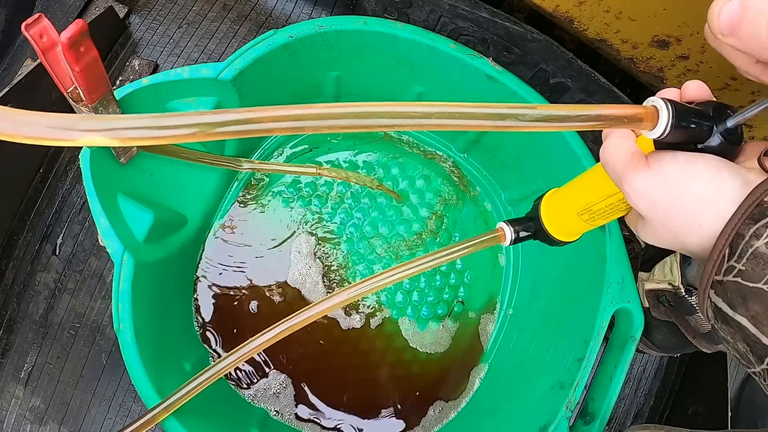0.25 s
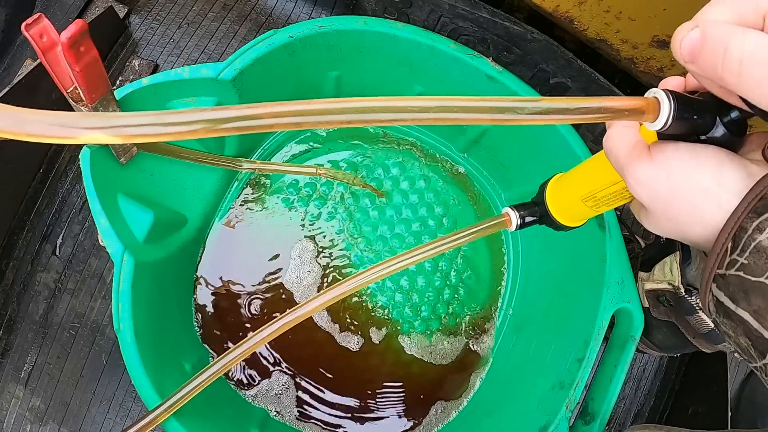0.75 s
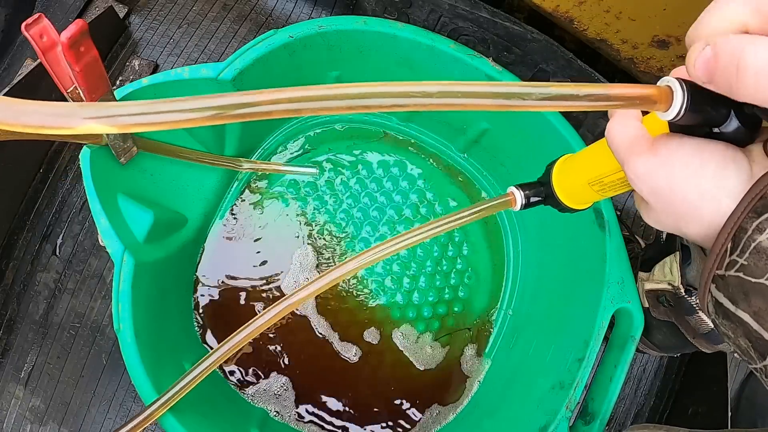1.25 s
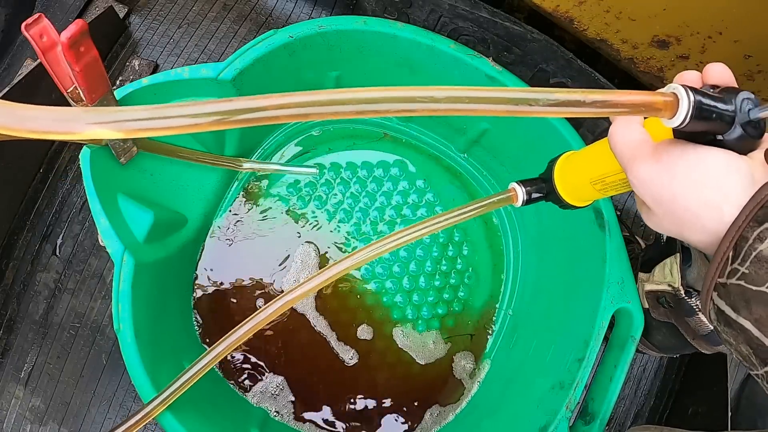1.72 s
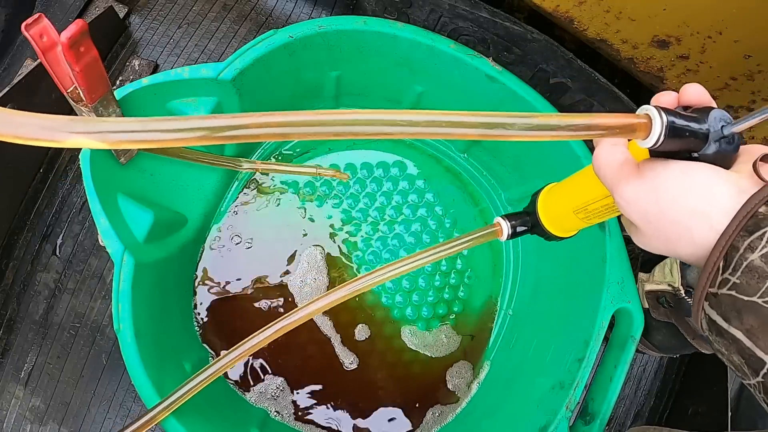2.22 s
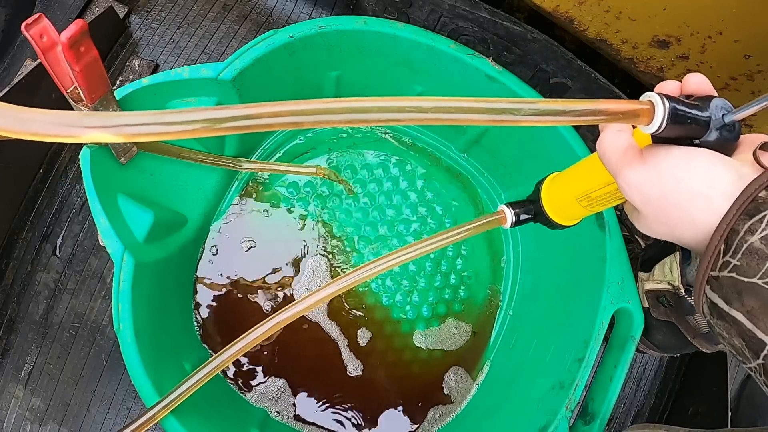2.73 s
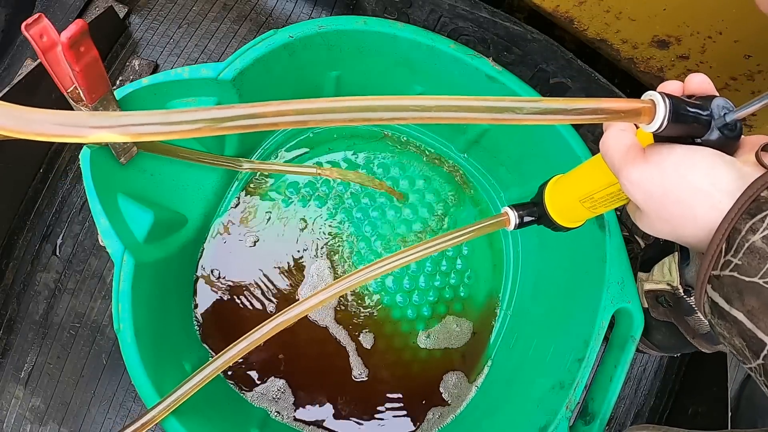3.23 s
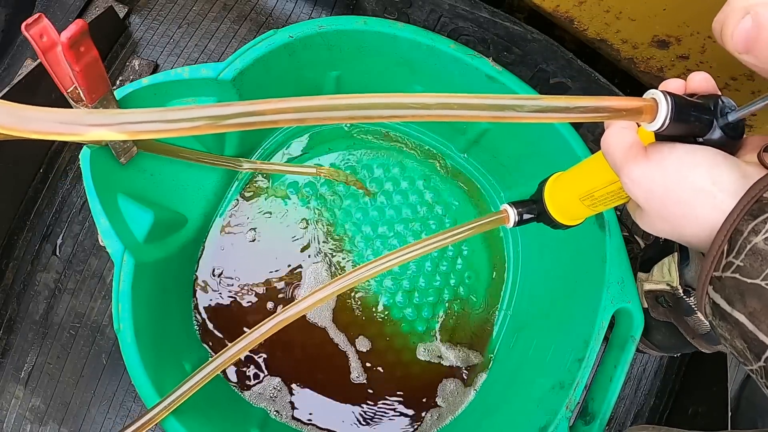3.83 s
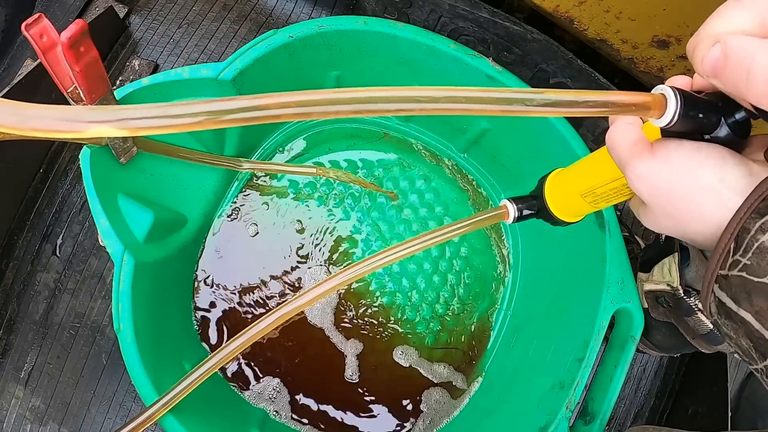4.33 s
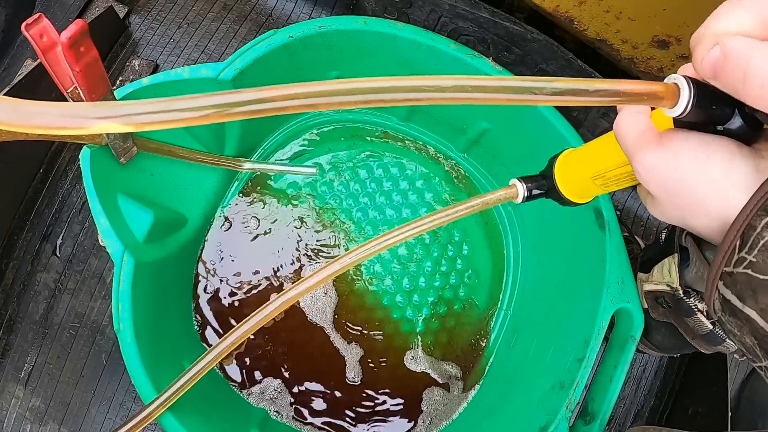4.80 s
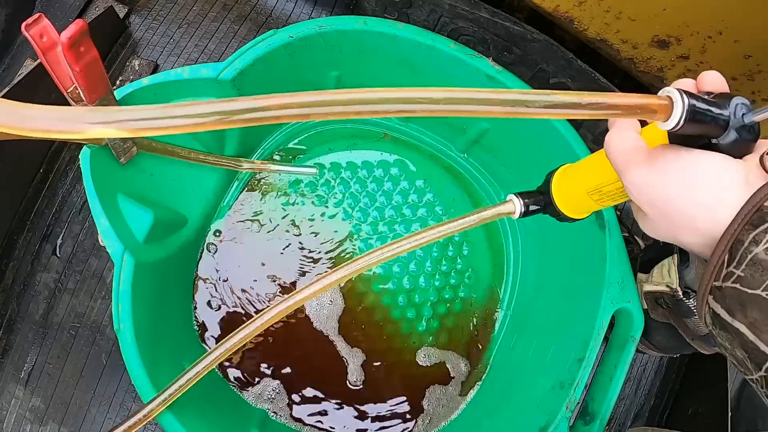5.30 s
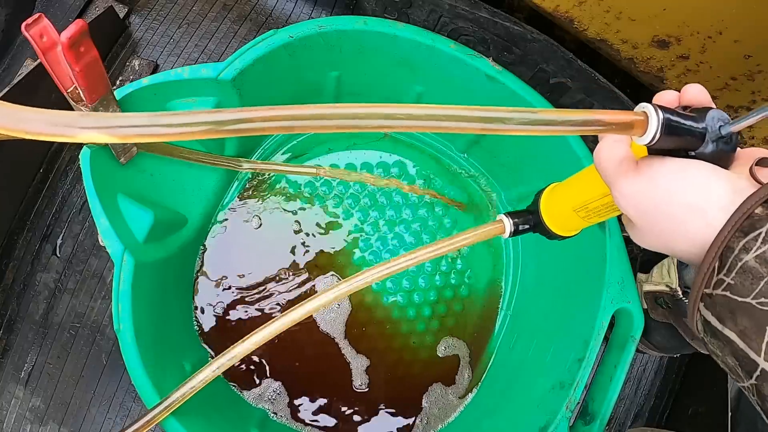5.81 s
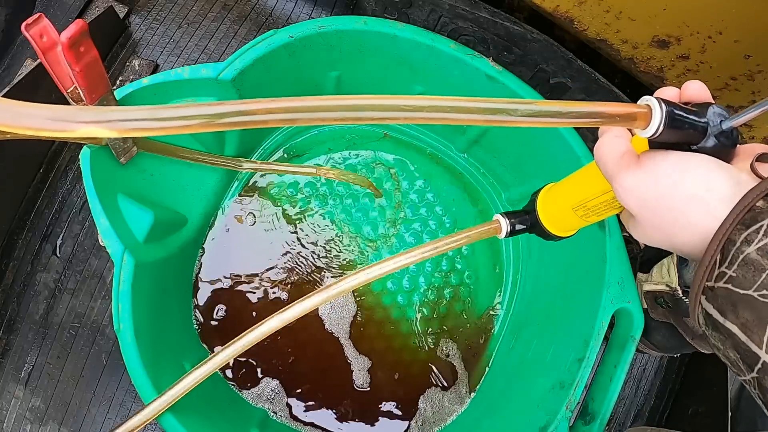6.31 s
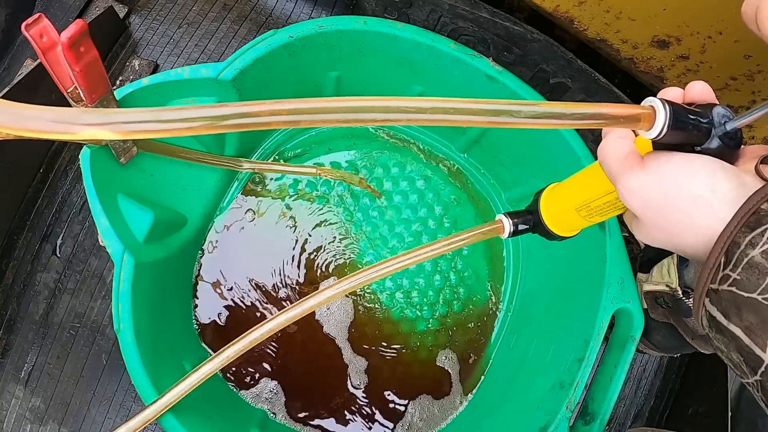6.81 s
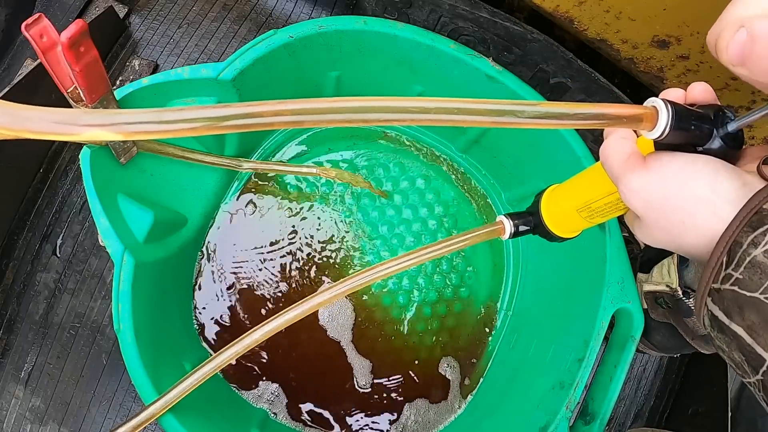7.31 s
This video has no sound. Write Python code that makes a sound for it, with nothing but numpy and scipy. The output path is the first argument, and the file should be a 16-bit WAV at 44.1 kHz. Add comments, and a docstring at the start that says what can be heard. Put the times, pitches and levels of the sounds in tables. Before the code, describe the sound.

Rubbery, scraping pump squeals alternate with quick breathy valve hisses. The first hiss ends in a sharp, rattling clack; after the second come chirps, ticks and hollow gulps in the hose. A thin jet of fuel spatters quietly in a plastic tub nearby, with short tub reflections and soft low rumble. Close pickup, starting nearly mono and widening, ending mid-squeal.

```python
"""Stiff hand pump filling a tub

A stiff hand pump draws fuel into a plastic tub, close to the microphone.
On long pulls the seal squeals (stick-slip tone and noise, breaking into chirps) and a thin stream patters (noise).
Each quick push hisses through the valve (noise); the first ends in a hard knock (decaying modes and rattle).
Air gulps through the hose after the second (rising, decaying tones). A low rumble (noise) lies underneath."""
import sys
import numpy as np
from scipy import signal
from scipy.fft import rfft, irfft, next_fast_len
from scipy.io import wavfile
from scipy.ndimage import uniform_filter1d, map_coordinates

SR = 44100
rng = np.random.default_rng(int(sys.argv[2]) if len(sys.argv) > 2 else 0)


def unload_wav(signal):
    """Save mono or channel-first audio to the path in sys.argv[1] as 16-bit WAV at rate SR, clipped to [-1, 1]."""
    wavfile.write(
        sys.argv[1],
        SR,
        np.round(np.clip(np.atleast_2d(signal).T, -1, 1) * 32767).astype(np.int16),
    )


N = 332955
TIME_S = np.arange(N) / SR

# Left-right likeness of noise: freq_hz, correlation
STEREO_LIKENESS = [(60, 1), (200, 0.11), (500, 0.59), (1500, 0.82), (3000, 0.73), (7000, 0.59),
                   (12000, 0.074)]
# Low rumble spectrum: freq_hz, density_db_per_hz
RUMBLE_SPECTRUM = [(12, -32.5), (20, -16), (49, -4.5), (65, 4.5), (76, -6), (92, -9.5), (113, -10.5),
                   (214, -8.5), (282, -23), (365, -31.5), (450, -30), (580, -31), (990, -120)]
# Background noise spectrum: freq_hz, density_db_per_hz
AIR_SPECTRUM = [(100, -5), (230, -5), (400, -10.5), (800, -17), (1400, -8), (3000, -40), (9000, -27.5),
                (15000, -37)]
# Dull bumps of handling: peak_s, level_db, rise_s, fall_s
BUMPS = [(.45, -35.5, 0.039, 0.08), (1.28, -33, 0.111, 0.21), (2.14, -29.5, 0.13, 0.31),
         (2.35, -33, 0.064, 0.04), (2.59, -39.5, 0.11, 0.082), (3.15, -31, 0.023, 0.094),
         (3.3, -32.5, 0.083, 0.038), (3.75, -40, 0.48, 0.4), (4.72, -36, 0.084, 0.38),
         (5.0, -40, 0.0356, 0.13), (5.65, -35.5, 0.14, 0.06)]
RUMBLE_DB, RUMBLE_SWAY_DB, RUMBLE_SWAY_KNOTS_PER_S = -47.5, 4.5, 18

# Patter in the tub: freq_hz, density_db_per_hz
SPLASH_SPECTRUM = [(150, -43), (250, -10), (326, -0.5), (557, -7.5), (753, -8.5), (927, -8), (1490, -5.5),
                   (1620, 0), (2020, -7.5), (4000, -11), (5200, -64), (8800, -120)]
# Hiss of the jet: freq_hz, density_db_per_hz
SPRAY_SPECTRUM = [(1060, -35), (1800, 0), (2750, -1.5), (2980, -1), (5650, 5), (6070, 2), (7470, 4.5),
                  (8630, 2), (9620, -6), (15500, -21.5)]
# Runs of the jet between pushes: start_s, end_s, level_db, build_up_s
SPURTS = [(-.1, 1.72, -52, .05), (2.25, 3.05, -53, .03), (2.8, 5.22, -51.5, .6), (5.75, 6.5, -48, .03),
          (6.2, 7.8, -51, .8)]
# Gushes of fuel into the tub: peak_s, level_db, rise_s, fall_s
GUSHES = [(.05, -58, 0.35, .5), (1.3, -52.5, 0.043, 0.437), (2.27, -52.5, 1, 0.326),
          (5.03, -48, 0.52, 0.29), (5.8, -54.5, 0.079, 0.087), (6.17, -43.5, 0.22, 0.16)]
SPURT_RELEASE_S, DRIBBLE_DB = .2, -66
# Reflections in the tub: freq_hz, t60_s
TUB_DECAY = [(200, 0.32), (1000, 0.188), (3000, 0.055), (10000, 0.0656)]

# Plunger hits its stop: start_s, level_db over the first 20 ms
SLAM = [(2.1065, -14.5)]
# Lighter knocks of plunger and hand: start_s, peak_db, lowpass_hz
KNOCKS = [(0.161, -26.5, 2410), (0.177, -34.5, 1000), (1.229, -37, 330), (4.82, -30.5, 336),
          (4.837, -40, 300), (4.926, -39.5, 970), (6.146, -34, 1800), (6.194, -32.5, 1600),
          (6.244, -36, 1500)]
# Pump body modes: freq_hz, mean_level_db, t60_s
BODY_MODES = [(164.8, -16, 0.38), (216.5, 1.5, 0.25), (249, 3, 0.14), (344.5, 8, 0.051), (472, 9.5, 0.036),
              (753, 2, 0.04), (1030, -2, 0.067), (1730, 1.5, 0.032), (2485, 13.5, 0.017),
              (3586, -2, 0.0323)]
# Rattle spectrum of a blow: freq_hz, density_db_per_hz
RATTLE_SPECTRUM = [(60, -26), (130, -11), (220, 0.5), (480, -6.5), (1000, -10.5), (1500, -0.5),
                   (2600, -6.5), (3600, -10), (6000, -19.5), (12000, -29)]
OCTAVES_HZ = 125 * 2.0 ** np.arange(7)
# Air gulps through the hose: start_s, level_db, start_pitch_hz
GLUGS = [(6.147, -31.5, 239), (6.165, -25.5, 227), (6.179, -33, 227), (6.192, -31, 250), (6.215, -50, 280)]
# Hose partials: pitch_multiple, level_db, t60_s
HOSE_PARTIALS = [(1, 0, .07), (2.08, -8, .04), (5.1, -3.5, 0.028), (5.9, -2, 0.028)]

# Valve hiss spectrum: freq_hz, density_db_per_hz
VALVE_SPECTRUM = [(120, -30.5), (200, -40), (244, -33), (607, -16.5), (858, -27), (1090, -10), (1480, -7.5),
                  (1650, -1), (2650, -11), (3960, -15), (8500, -20.5), (12900, -43), (15500, -51.5)]
# Valve resonances: freq_hz, width_hz, level_db
THROAT_MODES = [(3620, 100, -20), (5100, 200, -12), (6130, 140, -12), (8400, 350, -19)]
# Quick pushes: start_s, end_s, attack_s
PUSH_TIMES = [(1.655, 2.115, .07), (5.1, 5.6, .14)]
# Push strength: low_hiss_db, low_swell_per_push_db, high_hiss_db, fizz_db, fizz_fall_per_push_db
PUSH_HISS = [(-45, 17.5, -40.5, -46.5, 10), (-36.5, 6, -36.5, -42.5, 25.5)]
PUSH_RELEASE_S, HIGH_FALL_DB = 0.026, 2
LOW_FULL_SHARE, FIZZ_PEAK_SHARE = 0.4, 0.34  # shares of the push
CHURN_DB, CHURN_KNOTS_PER_S = 1.7, 55  # each hiss band surges by itself

# Barrel resonances: freq_hz, width_hz, level_db
BARREL_MODES = [(2616, 94, 0), (2777, 28, -4), (2876, 44, -4.5), (3166, 24, 0), (3242, 11, 4),
                (3558, 24.5, -9), (3620, 30, 2), (3977, 170, -1.5), (4145, 88, -0.5), (4508, 28, -14),
                (4896, 49, 4), (5420, 133, -4.5), (6610, 25, 8), (7946, 54, -9)]
# Dry friction spectrum: freq_hz, density_db_per_hz
RUB_SPECTRUM = [(710, -32), (1200, -23), (2210, -9.5), (2540, -9.5), (2680, -6.5), (3320, -8.5),
                (4020, -15), (4430, -5), (5550, -8.5), (6240, -3), (8150, -3), (8790, -14.5), (12900, -55),
                (15500, -61)]
RUB_GROWTH_DB_PER_DB, FIRM_DB = 0.21, -23.5  # extra rub per dB of effort, up to a firm pull
# Short snatches of seal and valve: start_s, peak_db, centre_hz, t60_s
TICKS = [(0.494, -32, 2310, 0.1), (.718, -39, 6950, 0.016), (1.238, -35, 1780, 0.13),
         (1.326, -27.5, 4300, 0.017), (1.342, -22.5, 4900, 0.021), (1.342, -26, 2620, 0.016),
         (1.341, -22, 7860, 0.017), (1.378, -32.5, 2230, 0.032), (1.394, -33.5, 2784, 0.029),
         (1.404, -25.5, 2650, 0.028), (1.44, -32.5, 3650, 0.12), (1.476, -32.5, 4400, 0.06),
         (2.258, -28.5, 4800, 0.029), (2.595, -19.5, 4970, 0.033), (3.162, -29, 8350, 0.018),
         (5.337, -18, 2940, 0.0153), (5.366, -18.5, 1800, 0.054), (5.592, -21.5, 3445, 0.035),
         (5.758, -34, 7900, 0.038), (6.091, -18.5, 2540, 0.046), (6.103, -21, 4056, 0.18),
         (6.164, -20.5, 8150, 0.031), (6.181, -22, 7600, 0.0245), (6.237, -17, 7150, 0.024),
         (6.282, -32.5, 4030, 0.016), (6.545, -24.5, 9100, 0.017), (6.625, -24, 7430, 0.032)]

# Single chirps (piston creeps, turns or bites):
# middle_s, length_s, pitch_hz, level_db, glide_octaves, scoop_octaves
CHIRPS = [(0.724, 0.025, 4820, -45, 0.013, -0.17), (0.755, 0.042, 4550, -44, -0.09, .15),
          (0.799, 0.034, 3520, -47, -0.039, 0.26), (0.805, 0.062, 4344, -48, 0.0074, 0.087),
          (0.882, 0.044, 3470, -50, -0.033, 0.045), (0.927, 0.046, 3850, -54, 0.044, -.08),
          (.985, 0.0365, 3500, -54, 0.16, 0.37), (1.277, 0.039, 2740, -47, -0.23, -0.016),
          (1.339, 0.032, 8120, -27, -0.01, -0.089), (1.52, 0.046, 2760, -40.5, .22, -0.2),
          (1.56, .035, 3080, -45, -.06, -0.12), (1.583, 0.083, 2570, -46, 0.056, 0.22),
          (1.652, 0.044, 6604, -41.5, 0.43, 0.39), (2.303, 0.0226, 6170, -33.5, 0.48, 0.02),
          (2.391, 0.021, 5480, -33.5, 0.36, 0.19), (2.434, 0.099, 6550, -35, 0.074, 0.3),
          (3.113, 0.0332, 5524, -39.5, -0.033, 0.058), (3.864, .022, 2560, -29.5, 0, .08),
          (3.944, 0.018, 2594, -21.5, 0, .02), (4.017, 0.018, 2700, -24, .05, 0),
          (4.158, 0.011, 5420, -30, 0, 0.0035), (4.216, 0.024, 4960, -24.5, 0, 0),
          (4.176, 0.011, 3980, -27.5, 0.011, 0), (4.37, 0.101, 7870, -36.5, -0.076, -0.21),
          (4.446, 0.077, 6220, -35, 0.079, 0.24), (4.505, 0.043, 4980, -52.5, 0, 0.15),
          (4.543, 0.1, 6270, -38.5, -0.11, -0.054), (4.59, 0.064, 4580, -46, -0.093, 0.38),
          (4.647, 0.056, 6060, -41.5, 0.12, 0.014), (4.71, 0.074, 6260, -46, 0.23, .2),
          (4.77, .05, 7650, -47, 0.058, .06), (5.139, 0.037, 5950, -38.5, 0.42, 0.32),
          (5.594, 0.01, 4920, -24.5, -0.14, 0.064), (5.759, 0.012, 5030, -28, 0.12, 0.4),
          (5.785, 0.046, 7300, -23.5, 0.1, 0.38), (5.859, 0.049, 4160, -27.5, 0.11, 0.74),
          (5.853, 0.07, 5060, -28.5, 0.082, 0.76), (5.951, 0.04, 7510, -27.5, 0.086, 0.19),
          (6.111, 0.014, 4050, -30, .05, 0.15), (6.003, 0.063, 7830, -36, 0.02, 0.24)]
# High chirps scrape more: pitch_hz, roughness_0_to_1
CHIRP_ROUGHNESS = [(2700, .5), (4000, .62), (5500, .76)]
CHIRP_EDGE_DB, CHIRP_OVERTONE_DB, CHIRP_STRANDS_DB = 5.5, -12, -5  # edge: fade at both ends

# Seal pitch, one list per long pull, lowest where the piston is fastest: time_s, pitch_hz
PULL_PITCH = [
    [(0, 3450), (.033, 3278), (.06, 3506), (.1, 3497), (.135, 3458), (.175, 3663), (.205, 3380),
     (.235, 3411), (.27, 3940), (.305, 3856), (.34, 4037), (.42, 4073), (.51, 4290), (.565, 3850),
     (.67, 3840), (.695, 4170)],
    [(3.1, 5400), (3.13, 5594), (3.18, 4961), (3.2, 5350), (3.28, 5960), (3.31, 6580), (3.345, 5120),
     (3.39, 5900), (3.42, 5320), (3.465, 6236), (3.49, 5386), (3.53, 5704), (3.57, 5040), (3.62, 4420),
     (3.69, 3567), (3.77, 3524), (3.79, 3165), (3.84, 3127), (3.87, 2690), (3.915, 2485), (3.945, 2622),
     (3.985, 2470), (4.05, 2868), (4.09, 3200), (4.12, 4220), (4.16, 3434), (4.205, 4850), (4.245, 4910),
     (4.265, 6770), (4.3, 7230), (4.33, 6050)],
    [(6.25, 4947), (6.28, 4050), (6.33, 5110), (6.357, 4180), (6.395, 5330), (6.445, 4300), (6.505, 4910),
     (6.54, 4606), (6.595, 6210), (6.63, 5640), (6.665, 6290), (6.69, 5001), (6.715, 4770), (6.76, 5360),
     (6.81, 4290), (6.835, 5014), (6.885, 4065), (6.94, 3824), (7.0, 4084), (7.035, 3186), (7.09, 3086),
     (7.15, 3530), (7.2, 3593), (7.23, 3870), (7.265, 2646), (7.283, 2525), (7.315, 3407), (7.345, 2798),
     (7.368, 2363), (7.41, 3015), (7.435, 2946), (7.463, 2600), (7.55, 2936)],
]
# Force of the hand, one list per pull: time_s, level_db
PULL_EFFORT = [
    [(0.0, -35.5), (0.032, -29), (0.045, -31.5), (0.232, -32), (0.268, -28), (0.3, -32), (.346, -31.5),
     (0.428, -30.5), (.56, -40), (0.736, -47.5), (1.05, -59.5)],
    [(3.1, -43), (3.11, -37.5), (3.225, -35), (3.266, -39.5), (3.376, -34.5), (3.4, -37.5), (3.53, -34.5),
     (3.61, -26), (3.84, -28.5), (3.875, -24.5), (3.9, -28), (3.94, -26), (4.11, -31), (4.135, -41),
     (4.175, -38), (4.198, -35), (4.208, -32), (4.25, -28.5), (4.33, -33)],
    [(6.25, -53), (6.42, -45.5), (6.465, -33.5), (6.488, -44), (6.498, -30), (6.59, -34), (6.676, -34),
     (6.69, -30.5), (6.78, -29), (6.8, -34), (6.876, -27.5), (6.886, -30.5), (6.96, -27), (6.976, -35),
     (7.006, -23.5), (7.2, -23), (7.276, -20), (7.43, -19.5), (7.46, -17), (7.55, -21)],
]
# Uneven slipping, one list per pull: time_s, roughness_0_to_1
PULL_ROUGHNESS = [
    [(0, .9), (.03, .45), (.05, .82), (.23, .9), (.27, .45), (.31, .8), (.5, .8), (.58, .3), (.69, .35)],
    [(3.1, .45), (3.3, .6), (3.45, .9), (3.62, .75), (3.76, .6), (3.81, 1), (3.92, .95), (3.945, .7),
     (3.98, 1), (4.16, 1), (4.21, .5), (4.33, .6)],
    [(6.25, .7), (6.5, .6), (6.62, .85), (6.72, .62), (6.95, .68), (7.05, .45), (7.12, .95), (7.24, 1),
     (7.278, .25), (7.305, .65), (7.338, .85), (7.355, .3), (7.385, .3), (7.42, .75), (7.46, .22),
     (7.5, .3), (7.55, .55)],
]
# How the seal sits, one row per pull: tone_db, overtone_db, strands_db, rub_db
GRIP = [(0, -1.5, -8, -2.5), (0, -4, -6.5, -7), (0, -8.5, -8.5, -5.5)]
# Second patch of the seal, one list per pull: time_s, pitch_hz, level_db
LIP = [
    [(.3, 4500, -49), (.44, 4610, -46), (.5, 4527, -39), (.535, 5344, -35.5), (.56, 4747, -45),
     (.63, 4500, -40), (.65, 5263, -41.5), (.69, 5435, -47)],
    [(3.41, 7600, -41), (3.46, 8200, -35), (3.485, 6610, -26), (3.53, 7084, -29.5), (3.6, 6312, -27),
     (3.64, 5398, -29), (3.68, 5316, -26.5), (3.72, 4800, -27.5), (3.755, 5300, -28), (3.78, 4140, -32),
     (3.85, 4250, -31), (3.9, 4037, -36.5), (4.0, 4550, -28.5), (4.04, 5297, -28), (4.06, 4928, -31),
     (4.095, 5447, -28.5), (4.13, 6141, -33.5), (4.148, 5560, -32), (4.158, 5406, -27.5), (4.18, 6446, -32),
     (4.21, 6780, -29), (4.25, 5778, -34)],
    [(6.45, 5380, -46), (6.67, 7140, -52.5), (6.71, 6290, -50), (6.78, 6100, -44), (6.81, 5100, -34),
     (6.85, 5740, -40), (6.9, 5017, -32.5), (7.01, 5195, -31), (7.05, 3975, -30.5), (7.23, 4194, -39),
     (7.28, 3700, -27), (7.315, 4390, -22.5), (7.36, 3750, -27), (7.41, 4155, -28.5), (7.47, 3915, -28.5),
     (7.55, 4153, -23.5)],
]
LIP_ROUGHNESS, LIP_OVERTONE_DB, LIP_STRANDS_DB = .72, -24, -6
# Stray squeals around the main pitch: offset_hz, level_db
STRANDS = [(-650, -8), (-320, -2), (380, -2), (900, -7), (1500, -12), (2450, -13)]
DIP_DB_PER_OCT = 1  # a brief dip in pitch is louder
JUDDER_OCT, JUDDER_KNOTS_PER_S = .026, 100
CATCH_DB, CATCH_KNOTS_PER_S = 2.2, 75  # each patch catches and lets go
HALF_HELD_ROUGHNESS, HOLD_SLOPE, LOOSE_DB = .85, 3.6, -7  # held half the time; rate of change; tone when loose
BREAK_UP_SHARE = .5  # tone power removed at full roughness
LOCK_SHARE, LOCK_REACH_HZ = .5, 260  # pull of a barrel resonance on the pitch

WIDEN_START_S, WIDEN_S = 1.02, 3.17
TOP_HZ = 15250


def amp(db):
    """Amplitude of a level in dB."""
    return 10 ** (np.asarray(db) / 20)


def unit(x):
    """Scale to rms 1."""
    return x / np.sqrt(np.mean(x ** 2) + 1e-20)


def along(points, hz):
    """Interpolate (freq_hz, value) points on a log frequency axis."""
    freq_hz, value = np.transpose(points)
    return np.interp(np.log(hz + 1), np.log(freq_hz + 1), value)


def curves(rows):
    """One value per sample for each column after the time."""
    s, *cols = np.transpose(rows)
    return [np.interp(TIME_S, s, c) for c in cols]


def sampled(rows):
    """Times from first row to last, and each column at those times."""
    s, *cols = np.transpose(rows)
    t = np.arange(max(s[0], 0), s[-1], 1 / SR)
    return [t] + [np.interp(t, s, c) for c in cols]


def stroke(start_s, end_s, attack_s, release_s):
    """Attack, hold and release between two times."""
    return np.clip(np.minimum((TIME_S - start_s) / attack_s, (end_s - TIME_S) / release_s), 0, 1)


def swells(rows):
    """Peaks that lie 20 dB lower one rise time before and one fall time after."""
    return sum(amp(db - 20 * np.maximum((s - TIME_S) / rise_s, (TIME_S - s) / fall_s))
               for s, db, rise_s, fall_s in rows)


def wobble(knots_per_s, size=N):
    """Smooth random curve through Gaussian knots."""
    knots = rng.standard_normal(int(size * knots_per_s / SR) + 4)
    return map_coordinates(knots, [np.arange(size) * knots_per_s / SR])


def filtered(x, response):
    """Apply a complex frequency response."""
    n = x.shape[-1]
    m = next_fast_len(n + 8192)
    return irfft(rfft(x, m) * response(np.fft.rfftfreq(m, 1 / SR)), m)[..., :n]


def resonance(f, hz, width_hz):
    """Response of a damped resonator, 1 at its centre."""
    return 1j * f * width_hz / (hz * hz - f * f + 1j * f * width_hz)


def rush(response, grain_db=0):
    """Stereo noise of rms 1, broken into grains of random size."""
    pair = rng.standard_normal((2, N)) * amp(grain_db * wobble(700))

    def mid_side(f):
        turn = np.arccos(np.clip(along(STEREO_LIKENESS, f), -1, 1)) / 2
        return response(f) * np.array([np.cos(turn), np.sin(turn)])

    mid, side = filtered(pair, mid_side)
    return unit(np.array([mid + side, mid - side]))


def add(track, s, sound):
    """Mix a sound in at time s."""
    part = track[max(round(s * SR), 0):][:len(sound)]
    part += sound[:len(part)]


def rumble(steady_db=-55, air_db=-60):
    """Deep, uneven low noise with bumps, over a steadier murmur of background noise."""
    deep = rush(lambda f: amp(along(RUMBLE_SPECTRUM, f)) / (1 + (f / 170) ** 4))
    deep = deep / np.sqrt(np.abs(uniform_filter1d(deep[0] ** 2, size=5000)) + 0.41)  # even out the level
    upper = rush(lambda f: amp(along(RUMBLE_SPECTRUM, f)) / (1 + (140 / (f + 1)) ** 4))
    upper = upper * amp(5.7 * wobble(19))
    sway = amp(RUMBLE_DB + RUMBLE_SWAY_DB * wobble(RUMBLE_SWAY_KNOTS_PER_S))
    level = np.hypot(sway, swells(BUMPS))
    air = rush(lambda f: amp(along(AIR_SPECTRUM, f)))
    return level * deep + amp(steady_db) * upper + amp(air_db) * air


def tub(x, apart=0.14):
    """Short, dense reflections from the tub, partly different at each ear."""
    hz, _, z = signal.stft(rng.standard_normal((2, SR // 4)), SR, nperseg=256)
    t = np.arange(z.shape[-1]) * 128 / SR
    decay = amp(-60 * t / along(TUB_DECAY, hz)[:, None])
    mid, side = signal.istft(z * decay, SR, nperseg=256)[1]
    tail = np.array([mid + apart * side, mid - apart * side])
    x = np.atleast_2d(x).mean(axis=0)
    delayed = np.pad(x, (60, 0))[None]
    return signal.fftconvolve(delayed, tail / np.linalg.norm(tail[0]), axes=1)[:, :N]


def stream(splash_db=-12, drops_db=-61, sway_db=0.5):
    """The jet hisses and patters in the tub, throwing off single droplets."""
    flow = sum(amp(db) * stroke(start_s, end_s, rise_s, SPURT_RELEASE_S)
               for start_s, end_s, db, rise_s in SPURTS)
    flow = flow * amp(sway_db * wobble(6.1)) + amp(DRIBBLE_DB)
    patter = rush(lambda f: amp(along(SPLASH_SPECTRUM, f)), grain_db=4)
    body = np.hypot(amp(splash_db) * flow, swells(GUSHES)) * patter
    jet = flow * rush(lambda f: amp(along(SPRAY_SPECTRUM, f)), grain_db=1.5)
    falls = rng.random(N) < 30 / SR  # 30 a second on average
    drops = falls * amp(1.9 * np.clip(rng.standard_normal(N), -2, 2)) * flow
    drops = unit(tub(filtered(drops, lambda f: resonance(f, 9300, 6330) ** 3)))
    return body + jet + amp(drops_db) * drops


def blow(push_db, ring_db, rattle_t60_s):
    """Hard double swing, ringing body and a rattle whose treble dies first; rms 1 over 20 ms."""
    t = np.arange(SR // 2) / SR
    push = np.sin(2 * np.pi * 930 * t) * (t / .0009) * np.exp(1 - t / .0009)
    ring = sum(amp(db + rng.normal(0, 1) - 60 * t / t60_s)
               * np.sin(2 * np.pi * hz * t + rng.uniform(0, 2 * np.pi)) for hz, db, t60_s in BODY_MODES)
    noise = rng.standard_normal(len(t))
    bands = np.array([filtered(noise, lambda f: amp(along(RATTLE_SPECTRUM, f)) * resonance(f, hz, hz))
                      for hz in OCTAVES_HZ])
    band_t60_s = rattle_t60_s * np.sqrt(1000 / OCTAVES_HZ[:, None])
    rattle = np.sum(bands * amp(-60 * t / band_t60_s), axis=0) / bands.sum(axis=0).std()
    hit = amp(push_db) * push + (amp(ring_db) * ring + rattle) * (1 - np.exp(-t / 0.000086))
    return hit / hit[:SR // 50].std()


def knocks():
    """The plunger's slam, and softer blows with their treble filtered off."""
    out = np.zeros(N)
    for s, db in SLAM:
        add(out, s, amp(db) * blow(push_db=10, ring_db=-7.5, rattle_t60_s=.058))
    for s, db, lowpass_hz in KNOCKS:
        lowpass = signal.butter(2, lowpass_hz, fs=SR, output="sos")
        hit = signal.sosfilt(lowpass, blow(push_db=-60.0, ring_db=-13.5, rattle_t60_s=0.061))
        add(out, s, amp(db) * hit / np.abs(hit).max())
    return out


def glugs(rise_per_s=.6):
    """Each gulp of air rings the hose, its pitch rising a little."""
    out, t = np.zeros(N), np.arange(SR // 6) / SR
    for s, db, hz in GLUGS:
        phase = 2 * np.pi * hz * t * (1 + rise_per_s * t)
        ring = sum(amp(db + level_db - 60 * t / t60_s) * np.sin(multiple * phase)
                   for multiple, level_db, t60_s in HOSE_PARTIALS)
        add(out, s, ring * (1 - np.exp(-t / 0.00075)))
    return out


def hiss(low_hz, high_hz):
    """Surging band of valve noise, coloured by the throat resonances."""
    def response(f):
        modes = 1 + sum(amp(db) * resonance(f, hz, width_hz) for hz, width_hz, db in THROAT_MODES)
        limits = np.sqrt((1 + (f / high_hz) ** 10) * (1 + (low_hz / (f + 1)) ** 10))
        return amp(along(VALVE_SPECTRUM, f)) * modes / limits

    return unit(amp(CHURN_DB * wobble(CHURN_KNOTS_PER_S))) * rush(response, grain_db=-1.5)


def valve():
    """Air and fuel forced through the valve; the hiss darkens as the plunger goes in."""
    low, high, fizz = hiss(150, 3900), hiss(3170, 11000), hiss(11600, 16600)
    out = np.zeros((2, N))
    for (start_s, end_s, attack_s), strength in zip(PUSH_TIMES, PUSH_HISS):
        low_db, swell_db, high_db, fizz_db, fizz_fall_db = strength
        travel = np.clip((TIME_S - start_s) / (end_s - start_s), 0, 1)
        build_up = np.minimum(travel / LOW_FULL_SHARE, 1)
        bands = amp(low_db + swell_db * (travel - .5)) * build_up * low
        bands += amp(high_db - HIGH_FALL_DB * (travel - .5)) * high
        bands += amp(fizz_db - fizz_fall_db * np.abs(travel - FIZZ_PEAK_SHARE)) * fizz
        out += stroke(start_s, end_s, attack_s, PUSH_RELEASE_S) ** 2 * bands
    return out


def barrel(f, floor=0.76):
    """The pump tube rings in a few narrow bands."""
    return floor + sum(amp(db) * resonance(f, hz, width_hz) for hz, width_hz, db in BARREL_MODES)


def rubbing():
    """Fine seal friction, coloured by the barrel; up to a firm pull it grows faster than the squeal."""
    level = np.zeros(N)
    for effort, (*_, rub_db) in zip(PULL_EFFORT, GRIP):
        force_db, = curves(effort)
        rub_level = amp(force_db + rub_db + RUB_GROWTH_DB_PER_DB * np.minimum(force_db - FIRM_DB, 0))
        level += stroke(effort[0][0] - .1, effort[-1][0] + 0.36, 0.61, 0.029) * rub_level
    friction = rush(lambda f: amp(along(RUB_SPECTRUM, f)) * barrel(f, 1.0), grain_db=2)
    return amp(-8.5) * level * friction


def ticks(relative_width=0.47, grit_db=4):
    """The seal snatches for a few milliseconds: a sharp burst of scattered slips."""
    out, t = np.zeros(N), np.arange(SR // 8) / SR
    for s, db, hz, t60_s in TICKS:
        def response(f):
            limits = (1 + (f / 12500) ** 8) * (1 + (1100 / (f + 1)) ** 4)
            return resonance(f, hz, relative_width * hz) / limits

        slips = rng.standard_normal(len(t)) * amp(grit_db * wobble(910.0, len(t)))
        burst = filtered(slips, response) * amp(-60 * t / t60_s) * (1 - np.exp(-t / 0.0014))
        add(out, s, amp(db) * burst / np.abs(burst).max())
    return out


def judder(t, hz, db, rough):
    """The rubber hops between nearby pitches while it catches and lets go."""
    hops = np.tanh(2 * wobble(JUDDER_KNOTS_PER_S, len(t)))
    catches = np.minimum(wobble(CATCH_KNOTS_PER_S, len(t)), 1)
    return t, hz * 2 ** (JUDDER_OCT * rough * hops), db + CATCH_DB * rough * catches


def locked(hz, share):
    """Draw a pitch towards the nearest barrel resonance, so that glides become steps."""
    modes_hz = np.sort(np.array(BARREL_MODES)[:, 0])
    nearest = np.searchsorted((modes_hz[1:] + modes_hz[:-1]) / 2, hz)
    offset_hz = modes_hz[nearest] - hz
    capture = share * LOCK_SHARE * np.exp(-(offset_hz / LOCK_REACH_HZ) ** 2)
    return uniform_filter1d(hz + capture * offset_hz, size=80)


def chirps():
    """Paths of short chirps: pitch glides and bends, loudest in the middle."""
    paths = []
    for s, length_s, hz, db, glide_oct, scoop_oct in CHIRPS:
        u = np.linspace(-1, 1, int(length_s * SR))
        rough = along(CHIRP_ROUGHNESS, hz)
        pitch_hz = hz * 2 ** (glide_oct * u + scoop_oct * u ** 2)
        path = judder(s + u * length_s / 2, pitch_hz, db - CHIRP_EDGE_DB * u ** 2, rough)
        paths.append((*path, rough, CHIRP_OVERTONE_DB, CHIRP_STRANDS_DB))
    return paths


def pulls(lip_unrest=1.25):
    """Paths of the seal's main patch and of the more restless second one."""
    # path: times_s, pitch_hz, level_db, roughness, overtone_db, strands_db
    main, second = [], []
    for pitch, effort, roughness, lip, grip in zip(PULL_PITCH, PULL_EFFORT, PULL_ROUGHNESS, LIP, GRIP):
        tone_db, overtone_db, strands_db, _ = grip
        t, hz = sampled(pitch)
        force_db = np.interp(t, *np.transpose(effort))
        rough = np.interp(t, *np.transpose(roughness))
        dip_db = DIP_DB_PER_OCT * np.log2(uniform_filter1d(hz, size=8000) / hz)
        path = judder(t, hz, force_db + tone_db + dip_db, rough)
        main.append((*path, rough, overtone_db, strands_db))
        lip_path = judder(*sampled(lip), lip_unrest)
        second.append((*lip_path, LIP_ROUGHNESS, LIP_OVERTONE_DB, LIP_STRANDS_DB))
    return main, second


def cycles(hz):
    """Phase in radians of a varying pitch."""
    return 2 * np.pi * np.cumsum(hz) / SR


def stray_strands(hz):
    """Other patches of rubber catch for a few milliseconds, each at its own pitch."""
    n, total = len(hz), 0
    for offset_hz, db in STRANDS:
        flicker = unit(amp(7.5 * np.minimum(wobble(130, n), 1.2)))
        pitch_hz = locked(hz + offset_hz * (1 + .22 * wobble(45, n)), 1) + 50 * wobble(400, n)
        total = total + flicker * np.sin(cycles(pitch_hz)) * amp(db)
    return total


def squeal(paths, jitter, third_db, skirt_db, rasp_db, flutter_db):
    """Stick-slip tone that holds a pitch for moments; in between, cycles scatter and strands flicker."""
    tone, rasp = np.zeros(N), np.zeros(N)
    for t, hz, db, rough, overtone_db, strands_db in paths:
        def wander(knots_per_s):
            return wobble(knots_per_s, len(t))

        hold = wander(CATCH_KNOTS_PER_S) + HOLD_SLOPE * (HALF_HELD_ROUGHNESS - rough)
        held = np.clip(.5 + 2 * hold, 0, 1)
        pitch_hz = locked(hz, rough)
        scatter = rough * (1.5 - held) * (.015 * wander(300) + jitter * wander(1100))
        phase = cycles(pitch_hz * (1 + scatter))
        edges = np.clip(np.minimum(t - t[0], t[-1] - t) / 0.0024, 0, 1)
        level = edges * amp(db)

        # the overtone fades with roughness and at high pitch
        second = amp(overtone_db + 3 * np.minimum(wander(60), 1)) * np.sin(2 * phase)
        second = second * (1 - rough ** 2 / 2) * np.interp(pitch_hz, [4100, 4700, 7500], [1, .15, 0])
        third = amp(third_db) * np.sin(3 * phase) * (pitch_hz < 2850)
        slips = np.sin(phase) + second + third
        flutter = unit(amp(flutter_db * rough * np.minimum(wander(320), 1.5)))
        firmness = amp(LOOSE_DB * (1 - held)) * np.sqrt(1 - BREAK_UP_SHARE * rough ** 2)
        add(tone, t[0], level * firmness * flutter * slips)

        def band(multiple, knots_per_s):  # noise around a multiple of the pitch
            return (wander(knots_per_s) * np.sin(multiple * phase)
                    + wander(knots_per_s) * np.cos(multiple * phase))

        skirt = band(0.96, 900) + amp(overtone_db) * band(2, 1100)
        scrape = amp(strands_db) * stray_strands(hz) + amp(skirt_db) * skirt
        scrape = scrape + amp(rasp_db) * band(1.22, 2200)
        add(rasp, t[0], level * rough * (1 - .5 * (held - .5)) * scrape)

    def limits(f):
        return 1 / np.sqrt((1 + (2400 / (f + 1)) ** 30) * (1 + (f / 8300) ** 18))

    # slips spray a little treble
    grit = np.abs(rasp) * rush(lambda f: resonance(f, 8860, 4960) ** 2 / (1 + (f / 12500) ** 8))
    tone = filtered(tone, lambda f: barrel(f, 2.01) / 2)
    rasp = filtered(rasp, lambda f: barrel(f) * limits(f))
    return tone + rasp + amp(-20.5) * grit


def scene():
    """The pump's squeals and knocks echo in the tub, over valve, stream and rumble."""
    main, second = pulls()
    seal = squeal(main + chirps(), jitter=.018, third_db=-21, skirt_db=-10.5, rasp_db=-11, flutter_db=3.5)
    lip = squeal(second, jitter=.018, third_db=-35, skirt_db=-8, rasp_db=-15, flutter_db=4)
    squeaks, hits = seal + lip + ticks(), knocks() + glugs()
    echoes = amp(-8) * tub(squeaks, apart=.9) + amp(-19) * tub(hits)
    return squeaks + hits + echoes + rubbing() + valve() + stream() + rumble()


def record(dry, lag_s=.000048):
    """Sound reaches the right microphone just before the left; the image widens; the top is cut off."""
    def ears(f):
        return amp([[-.3], [.3]]) * np.exp(1j * np.pi * f * lag_s * np.array([[-1], [1]]))

    left, right = filtered(dry, ears)
    width = np.clip((TIME_S - WIDEN_START_S) / WIDEN_S, .01, 1)  # from nearly mono to full
    mid, side = (left + right) / 2, width * (left - right) / 2
    return filtered(np.array([mid + side, mid - side]), lambda f: f < TOP_HZ)


dry = scene()
out = record(dry)
unload_wav(out)
```